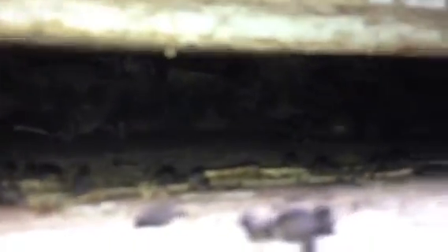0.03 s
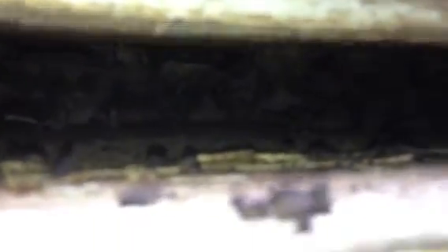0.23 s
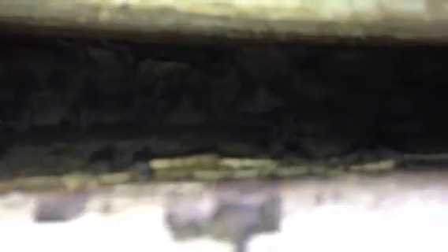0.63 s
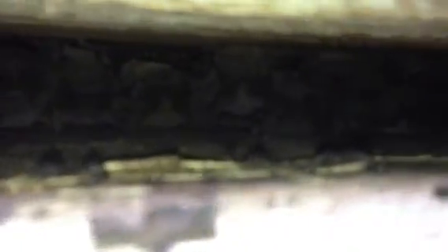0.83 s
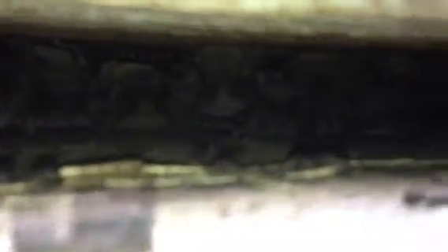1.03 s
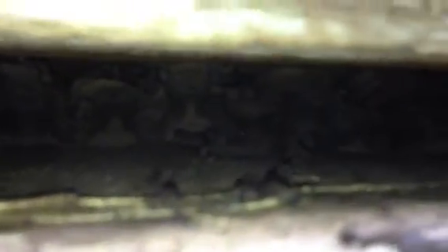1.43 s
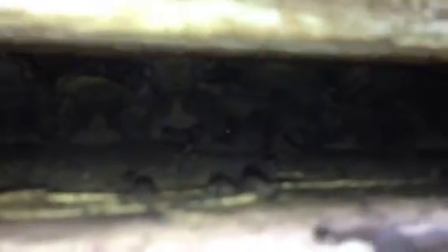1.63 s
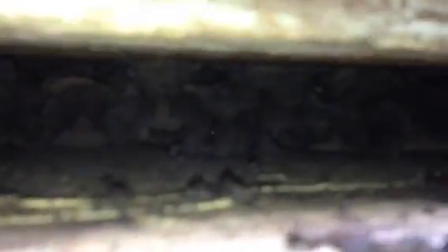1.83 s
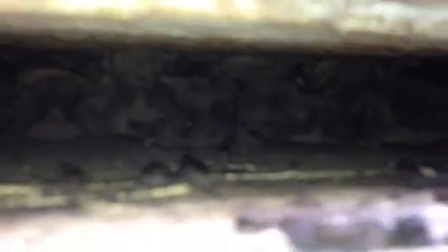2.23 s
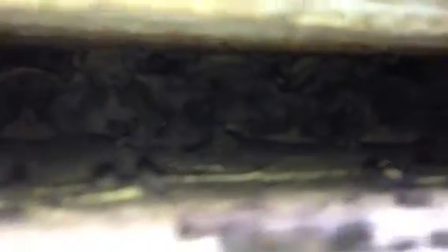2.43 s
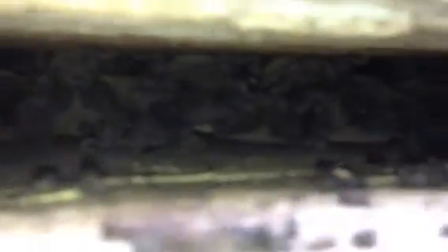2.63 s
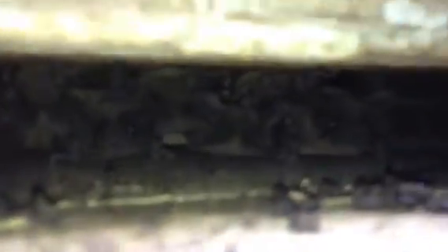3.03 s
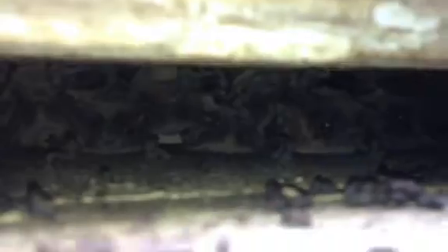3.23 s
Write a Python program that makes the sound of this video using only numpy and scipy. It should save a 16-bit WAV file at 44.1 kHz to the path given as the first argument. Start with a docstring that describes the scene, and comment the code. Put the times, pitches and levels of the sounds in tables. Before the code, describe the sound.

A bat colony chitters inside a vent, with piercing chirps, thin squeaks and scratchy clicks.

```python
"""Bats in a roof vent

A colony chitters close by: piercing chirps, mostly downward, thin squeaks and squeals, and rasping
click trains. Soft low mews, a second oscillator in the throat, flutter the squeaks and roughen them.
More bats twitter deeper in the cavity, with one shrill trill. The vent rings and the roof echoes;
a steady hiss, faint ticks and whistles and one soft bump lie underneath."""
import sys
import numpy as np
from scipy import signal
from scipy.fft import rfft, irfft, next_fast_len
from scipy.io import wavfile
from scipy.ndimage import uniform_filter1d, map_coordinates

SR = 44100
rng = np.random.default_rng(int(sys.argv[2]) if len(sys.argv) > 2 else 0)


def digitize_waveform(pressure):
    """Quantize a signal to 16-bit integers and store it at the path in sys.argv[1].

    Rows of a 2-D input are taken as channels; values are limited to [-1, 1].
    """
    field = np.atleast_2d(pressure).T
    bounded = np.clip(field, -1, 1)
    quanta = np.round(bounded * 32767).astype(np.int16)
    wavfile.write(sys.argv[1], SR, quanta)


N = 145530

# hiss spectrum (frequency [Hz], level [dB])
HISS_SPECTRUM = [(25, 2), (70, -14), (148, -1.5), (190, 2), (300, -5.5), (542, -9.5), (749, -5.5),
                 (1060, -10), (1510, -14.5), (1730, -10), (2390, -17.5), (2970, -16.5), (3680, -19),
                 (4690, -13.5), (5520, -17), (6400, -10.5), (7100, -1.5), (8000, -12), (9720, -17.5),
                 (11100, -12.5), (13100, -9), (14600, -7.5), (15800, -7)]
# click trains (time [s], length [s], first rate [1/s], last rate [1/s], body [dB], ring [dB], treble [dB])
RASPS = [(.003, 0.047, 233, 110, -55.5, -55, -50.5), (0.234, 0.0061, 1500, 1070, -54, -45.5, -51),
         (0.638, 0.046, 730, 434, -44, -56, -70), (0.725, 0.0074, 1340, 510, -36, -32.5, -34.5),
         (0.819, 0.0033, 2130, 1040, -39, -34.5, -30.5), (1.079, 0.0058, 1500, 830, -48.5, -45, -35),
         (2.194, 0.0072, 1750, 940, -43, -39, -39), (1.133, 0.052, 230, 310, -75, -75, -43.5),
         (1.343, .009, 900, 600, -40, -41.5, -37), (1.441, .0075, 1720, 1500, -41.5, -33.5, -25.5),
         (1.527, 0.021, 1630, 1970, -54, -42, -34.5), (1.681, 0.028, 2400, 1800, -62, -46, -32.5),
         (1.709, 0.025, 960, 600, -71, -51, -33), (1.825, 0.013, 2150, 650, -42.5, -32, -31),
         (1.92, 0.02, 2100, 650, -40, -36.5, -36.5), (1.967, 0.0063, 446, 374, -36.5, -36.5, -43),
         (2.2237, 0.015, 700, 680, -35.5, -36, -46), (2.305, .02, 2060, 750, -38, -43.5, -50),
         (2.323, 0.018, 650, 750, -35, -43, -39.5), (2.406, 0.026, 1800, 460, -37.5, -43.5, -46),
         (2.432, 0.022, 390, 560, -40, -52, -23), (2.4518, 0.0064, 1730, 1650, -44, -55, -24.5),
         (2.472, 0.01, 145, 170, -48, -49, -41), (2.5639, 0.043, 240, 240, -40, -39, -39.5),
         (2.692, 0.0068, 1900, 1600, -48.5, -42, -33), (2.709, 0.035, 310, 470, -38.5, -35, -42),
         (2.84, .0065, 2150, 2300, -41, -40, -29), (2.851, 0.037, 267, 390, -39, -35, -37)]
# three rasp resonances, each (frequency [Hz], level [dB])
BODY_SPECTRUM = [(180, -54), (300, -16), (432, -13), (703, 1.5), (989, 0.5), (1250, 5.5), (1460, 0),
                 (1730, 5), (2180, -3), (2490, -6), (2890, -6), (3860, -18), (4700, -14), (5500, -29),
                 (7150, -24), (12100, -120)]
RING_SPECTRUM = [(3000, -39), (5000, -12), (6300, -6), (7200, 2), (8300, -0.5), (9500, -8), (12000, -67)]
TREBLE_SPECTRUM = [(6000, -28.5), (9000, -25), (10800, 4), (12500, 0), (14000, -3.5), (15500, -15.5)]
# calls, each (time [s], length [s], first pitch [Hz], middle pitch [Hz], last pitch [Hz], level [dB])
SQUEAKS = [(0.039, 0.023, 7800, 7480, 7540, -43.5), (0.247, 0.0071, 9700, 9450, 9000, -40),
           (0.454, 0.059, 11400, 9900, 9100, -50.5), (0.577, 0.036, 10000, 8850, 9000, -44.5),
           (0.615, 0.011, 10250, 7320, 5860, -44), (.8165, .005, 7350, 7780, 8380, -26.5),
           (0.876, 0.032, 8600, 9100, 8200, -46), (0.93, 0.016, 12300, 12700, 13000, -44.5),
           (0.962, 0.017, 8800, 8110, 8800, -33), (1.077, 0.0048, 8400, 8730, 7700, -30.5),
           (1.087, 0.014, 12600, 11400, 11500, -40), (1.176, 0.028, 9800, 10100, 10800, -53),
           (1.352, .016, 10900, 14000, 11200, -38.5), (1.44, 0.012, 9000, 8180, 7430, -33.5),
           (1.603, 0.0073, 8900, 8440, 8100, -35), (1.77, 0.052, 8750, 8900, 7850, -47.5),
           (1.869, 0.02, 8300, 8100, 8000, -49.5), (1.915, 0.0052, 7530, 7600, 7400, -27),
           (1.937, .024, 15200, 15000, 14300, -43), (2.006, 0.017, 8700, 7980, 7550, -41.5),
           (2.161, 0.014, 7800, 7500, 6350, -39.5), (2.189, 0.0048, 7200, 7460, 7450, -28.5),
           (2.249, 0.014, 10300, 11360, 9850, -31), (2.305, 0.0095, 8020, 7980, 7700, -42.5),
           (2.401, .008, 8300, 7850, 7760, -41), (2.449, 0.01, 12130, 11670, 10200, -24.5),
           (2.507, 0.062, 13000, 10900, 10150, -43), (2.532, 0.0056, 7700, 8000, 8400, -30.5),
           (2.667, 0.013, 12800, 10500, 8750, -43), (3.012, 0.035, 13100, 12600, 11800, -44),
           (3.126, 0.018, 8250, 7800, 7040, -47), (3.276, 0.013, 8700, 7740, 7000, -39)]
MEWS = [(.055, 0.009, 1800, 1720, 1640, -41.5), (0.073, 0.012, 2240, 2010, 1860, -48),
        (.133, 0.019, 1820, 2030, 1930, -48), (0.233, 0.019, 1680, 2064, 2020, -46.5),
        (0.298, 0.033, 1820, 2140, 2210, -50.5), (0.49, 0.026, 2200, 2030, 2040, -54),
        (0.619, 0.0076, 1750, 1745, 1640, -36), (0.771, 0.02, 1780, 2000, 2200, -49),
        (0.836, 0.0038, 1630, 1720, 1730, -35.5), (0.874, 0.018, 2250, 2140, 1950, -51),
        (0.971, 0.0057, 1810, 1780, 1680, -45.5), (1.078, 0.018, 1726, 1565, 1430, -46),
        (1.164, 0.032, 1453, 1705, 1580, -43.5), (1.272, 0.0074, 1430, 1406, 1360, -39.5),
        (1.441, .011, 1706, 1702, 1590, -35), (1.527, 0.03, 1664, 1820, 1580, -37.5),
        (1.678, 0.035, 1990, 1977, 1730, -41), (1.826, 0.018, 1590, 1556, 1570, -41),
        (1.926, .018, 1720, 1300, 1110, -42.5), (2.007, 0.013, 1550, 1640, 1700, -46),
        (2.069, 0.0098, 1910, 1796, 1730, -38), (2.194, 0.0089, 1710, 1670, 1570, -38.5),
        (2.306, 0.0093, 1850, 1680, 1310, -48), (2.401, 0.0093, 1830, 1740, 1390, -44),
        (2.535, 0.018, 1790, 1920, 1850, -42.5), (2.689, 0.013, 1800, 2020, 2140, -45),
        (2.836, 0.0096, 2200, 2100, 2120, -43.5), (2.989, .02, 1790, 1914, 2220, -45.5),
        (3.124, 0.011, 1700, 1606, 1540, -50), (3.179, 0.0031, 1800, 1830, 1700, -41),
        (3.285, 0.003, 1730, 1600, 1570, -42)]
CHIRPS = [(.139, .008, 14500, 12500, 10000, -33), (.278, .0062, 15600, 13500, 13400, -9),
          (.4005, .005, 15600, 14000, 15200, -12), (.5148, .005, 15200, 13800, 14900, -12),
          (.555, .006, 8000, 10000, 12500, -31), (.6163, .005, 15100, 14200, 14300, -13),
          (.629, .006, 6800, 8400, 11000, -24), (.7345, .007, 11500, 13800, 15800, -19),
          (.8356, .0057, 13700, 12500, 14800, -8), (.865, .003, 15000, 13000, 11500, -27),
          (.8797, .003, 15000, 12800, 11000, -22), (1.025, .006, 13500, 11500, 10000, -30),
          (1.1183, .004, 15400, 13600, 11600, -20), (1.144, .003, 15500, 14300, 13500, -23),
          (1.1498, .0045, 15500, 13200, 10500, -17), (1.286, .006, 14000, 11800, 10000, -35),
          (1.482, .007, 14800, 12500, 10500, -35), (1.526, .0075, 15700, 13600, 10800, -15),
          (1.582, .005, 10000, 12500, 14500, -29), (1.595, .007, 13000, 10800, 9500, -31),
          (1.622, .008, 15700, 13200, 10800, -14), (1.719, .006, 15300, 12900, 10800, -16),
          (1.8155, .0085, 15700, 12900, 10300, -12.5), (1.9128, .0072, 15600, 13400, 10500, -14),
          (1.9628, .006, 15000, 13500, 14200, -16.5), (2.108, .0065, 15500, 13600, 14700, -17),
          (2.3412, .0035, 12000, 11400, 11200, -19), (2.3525, .006, 15300, 13900, 15200, -18.5),
          (2.4795, .004, 10000, 12000, 14500, -29), (2.495, .0055, 15300, 14300, 15300, -20),
          (2.549, .004, 12000, 13500, 15000, -29), (2.7275, .006, 15500, 14200, 15200, -19),
          (2.750, .004, 9000, 8300, 7500, -19), (2.794, .006, 8000, 10500, 13500, -36),
          (2.8925, .0028, 9000, 8400, 7700, -21), (2.954, .003, 10000, 12500, 15500, -27),
          (2.9595, .004, 11500, 9500, 8300, -29), (3.113, .005, 9000, 11500, 14000, -33),
          (3.179, .004, 9500, 12500, 15000, -22), (3.283, .006, 9500, 12300, 15000, -27),
          (.264, .006, 13500, 11800, 10500, -38), (.852, .004, 8000, 10500, 14000, -33),
          (1.272, .008, 10000, 12200, 13500, -39), (1.327, .007, 7500, 9200, 12000, -41),
          (2.624, .005, 8500, 11500, 15000, -38), (2.927, .009, 10500, 13000, 14500, -39),
          (3.089, .005, 11000, 13000, 15500, -36)]
# mew overtones (harmonic number, level [dB])
MEW_OVERTONES = [(2, -22), (3, -21), (4, -21)]
# bending squeals, one list of points each (time [s], pitch [Hz], level [dB])
SQUEALS = [
    [(.209, 14900, -37), (.217, 14200, -30), (.224, 10800, -27.5), (.231, 10330, -39)],
    [(.374, 13800, -33), (.39, 10800, -35.5), (.405, 10200, -39), (.416, 9500, -43), (.423, 7650, -50)],
    [(1.524, 7500, -33), (1.533, 7960, -43), (1.557, 8400, -32), (1.564, 7500, -39)],
    [(1.674, 8180, -22), (1.679, 8560, -34), (1.682, 8050, -25), (1.686, 8080, -30), (1.692, 8190, -29),
     (1.705, 8400, -26.5), (1.712, 8800, -30.5), (1.717, 8430, -29), (1.72, 7300, -33)],
    [(2.058, 7540, -30), (2.063, 7250, -29.5), (2.069, 8400, -28), (2.078, 8140, -29.5)],
    [(2.68, 7550, -24), (2.685, 6270, -34.5), (2.69, 7650, -27), (2.695, 8360, -30)],
    [(2.8215, 7200, -35), (2.824, 6300, -38), (2.834, 6660, -28), (2.837, 7590, -22), (2.84, 7600, -28.5),
     (2.846, 8540, -28)],
    [(2.966, 7070, -32), (2.976, 7120, -29), (2.981, 8070, -25.5), (2.986, 7970, -21.5), (2.99, 9330, -32),
     (3.008, 8950, -25.5), (3.012, 9500, -37), (3.018, 9000, -25), (3.027, 8980, -29), (3.031, 9400, -39),
     (3.039, 9200, -40)],
]
# bump modes (frequency [Hz], level [dB], T60 [s])
BUMP_MODES = [(171, -32, 0.022), (250, 0, 0.034), (366, -0.5, 0.018), (444, 7.5, 0.023), (784, -2.5, 0.035)]
# sweep of one trill note (first pitch [Hz], middle pitch [Hz], last pitch [Hz])
TRILL_SWEEP = [16000, 14800, 13100]
# held whistles (time [s], length [s], pitch [Hz], level [dB])
WHISTLES = [(2.49, .17, 4650, -62), (2.8, .18, 4600, -65), (3.16, .14, 4550, -60.5)]
# bounces off the vent walls (delay [s], level [dB])
WALL_BOUNCES = [(.0007, -28), (.0013, -21.5), (.0022, -21.5)]

CHIRP_TAPER, SQUEAK_TAPER, MEW_TAPER = .95, .1, .38  # share of a call spent rising and falling
GRIT_PER_S = 2000


def amp(db):
    """Decibels to gain."""
    return 10 ** (np.asarray(db) / 20)


def unit(x):
    """Scale to rms 1."""
    return x / np.sqrt(np.mean(x ** 2) + 1e-20)


def add(track, time_s, x):
    """Mix x into the track at time_s."""
    i = min(N, max(0, round(time_s * SR)))
    track[i:i + len(x)] += x[:N - i]


def wobble(knots_per_s, n):
    """Smooth random curve, n samples."""
    return map_coordinates(rng.standard_normal(256), [np.arange(n) * knots_per_s / SR], mode="mirror")


def grit(depth, n):
    """Fast random flicker of level and phase: complex gain, rms 1."""
    level = unit(np.exp(depth * wobble(GRIT_PER_S, n)))
    return level * np.exp(1j * depth * wobble(GRIT_PER_S, n))


def coloured(x, spectrum):
    """Minimum-phase filter through points (frequency [Hz], level [dB])."""
    m = 2 * next_fast_len(len(x))
    hz, db = np.transpose(spectrum)
    bin_db = np.interp(np.log(np.fft.rfftfreq(m, 1 / SR) + 1), np.log(hz + 1), db)
    cepstrum = irfft(np.log(amp(bin_db)), m)
    cepstrum[1:m // 2] *= 2
    cepstrum[m // 2 + 1:] = 0
    return irfft(rfft(x, m) * np.exp(rfft(cepstrum)), m)[:len(x)]


def wavering_phase(hz, depth=.009, knots_per_s=500):
    """Phase of a slightly unsteady voice on this pitch curve."""
    return 2 * np.pi * np.cumsum(hz * (1 + depth * wobble(knots_per_s, len(hz)))) / SR


def call(length_s, pitches_hz, taper):
    """Envelope and phase of one call arching through three pitches."""
    n = max(16, round(length_s * SR))
    arch_hz = np.polyval(np.polyfit([0, .5, 1], pitches_hz, 2), np.linspace(0, 1, n))
    return np.sqrt(2) * signal.windows.tukey(n, taper), wavering_phase(arch_hz)


def puffed(clicks, share=1, puff_db=-26.5, t60_s=.028):
    """Clicks, each trailed by a short puff of noise."""
    decay = amp(-60 / (t60_s * SR))
    envelope = signal.lfilter([1], [1, -decay], clicks)
    return clicks + share * amp(puff_db) * envelope * rng.standard_normal(len(clicks))


def scattered(x, wet_db, t60_s=.009, delay_s=.0006):
    """Short call blurred by the nearest surfaces, energy unchanged."""
    t = np.arange(SR // 50) / SR
    tail = rng.standard_normal(len(t)) * amp(-60 * t / t60_s) * (t > delay_s)
    echo = signal.fftconvolve(x, tail)
    echo *= amp(wet_db) * np.linalg.norm(x) / np.linalg.norm(echo)
    both = np.pad(x, (0, len(t) - 1)) + echo
    return both * np.linalg.norm(x) / np.linalg.norm(both)


def hiss(level_db=-47.5, patch_db=2):
    """Steady noise, slightly patchy in time and frequency."""
    noise = signal.stft(rng.standard_normal(N), nperseg=512)[2]
    patches = uniform_filter1d(rng.standard_normal(noise.shape), size=8, axis=0)
    patches = unit(uniform_filter1d(patches, size=12, axis=1))
    patchy = signal.istft(noise * amp(patch_db * patches), nperseg=512)[1][:N]
    return amp(level_db) * unit(coloured(patchy, HISS_SPECTRUM))


def rasp_spectrum(levels_db):
    """Power sum of the three resonances, each at its own level."""
    hz = np.geomspace(100, SR / 2, 200)
    power = 0
    for db, resonance in zip(levels_db, (BODY_SPECTRUM, RING_SPECTRUM, TREBLE_SPECTRUM)):
        shape_hz, shape_db = np.transpose(resonance)
        part = amp(np.interp(np.log(hz), np.log(shape_hz), shape_db)) ** 2
        power += amp(db) ** 2 * part / np.sum(part * np.gradient(hz))
    return np.column_stack([hz, 10 * np.log10(power)])


def rasps(ragged_below_per_s=700, jitter_cycles=.1, scatter_db=1.8, swell_db=2.5):
    """Swelling click trains at a gliding rate: ragged when slow, a tone when fast."""
    out = np.zeros(N)
    for time_s, length_s, first_per_s, last_per_s, *levels_db in RASPS:
        n = round(length_s * SR)
        slip, size = rng.standard_normal((2, 128))
        rate_per_s = np.geomspace(first_per_s, last_per_s, n)
        cycles = np.cumsum(rate_per_s) / SR
        k = np.arange(min(len(slip), int(cycles[-1]) + 1))
        ragged = np.minimum(1, ragged_below_per_s / np.interp(k, cycles, rate_per_s)) ** 2
        at = np.interp(k + jitter_cycles * ragged * slip[k], cycles, np.arange(n)).astype(int)
        click_db = scatter_db * ragged * size[k] + swell_db * np.sin(np.pi * at / n)
        clicks = np.bincount(at, amp(click_db), n + SR // 20)
        rasp = coloured(puffed(clicks, ragged.mean()), rasp_spectrum(levels_db))
        add(out, time_s, np.linalg.norm(amp(levels_db)) * np.sqrt(n) * rasp / np.linalg.norm(rasp))
    return out


def ticks(rate_per_s=36, body_db=-62, treble_boost_db=5, scatter_db=3):
    """Faint stray clicks through the body and treble resonances."""
    slip, low, high = rng.standard_normal((int(rate_per_s * N / SR), 3)).T
    at = ((np.arange(len(slip)) + slip) * SR / rate_per_s).astype(int) % N
    body = unit(coloured(puffed(np.bincount(at, amp(scatter_db * low), N)), BODY_SPECTRUM))
    treble = unit(coloured(puffed(np.bincount(at, amp(scatter_db * high), N)), TREBLE_SPECTRUM))
    return amp(body_db) * (body + amp(treble_boost_db) * treble)


def far_bats(rate_per_s=32, centre_hz=11400, length_s=.005, level_db=-46.5, scatter_db=4.5):
    """Scratchy up or down twitters deeper in the roost, loosely spaced."""
    out = np.zeros(N)
    for k in range(int(rate_per_s * N / SR)):
        slip, pitch, size, stretch, slope = rng.standard_normal(5)
        glide = np.sign(slope) * np.array([-.3, 0, .3])
        pitches_hz = centre_hz * np.exp(.12 * pitch + glide)
        swell, phase = call(length_s * np.exp(.5 * stretch), pitches_hz, CHIRP_TAPER)
        twitter = scattered(swell * np.imag(grit(.28, len(swell)) * np.exp(1j * phase)), wet_db=6)
        add(out, abs(k + slip) / rate_per_s, amp(level_db + scatter_db * size) * twitter)
    return out


def high_voice(swell, phase, octave_db=-7.5):
    """The throat's hoarse high oscillator, complex; its octave sounds only below Nyquist."""
    octave = amp(octave_db) * (np.gradient(phase) < np.pi / 2)
    return swell * grit(.12, len(swell)) * (np.exp(1j * phase) + octave * np.exp(2j * phase))


def squeaks():
    """Thin, drawn-out arches of the high oscillator."""
    out = np.zeros(N, complex)
    for time_s, length_s, *pitches_hz, db in SQUEAKS:
        add(out, time_s, amp(db) * high_voice(*call(length_s, pitches_hz, SQUEAK_TAPER)))
    return out


def mews(flicker_per_s=800, grit_depth=.28, saturation_db=-34):
    """The throat's low oscillator: its sound and the flutter it puts on the high one."""
    sound, flutter = np.zeros(N), np.zeros(N, complex)
    for time_s, length_s, *pitches_hz, db in MEWS:
        swell, phase = call(length_s, pitches_hz, MEW_TAPER)
        n = len(swell)
        flicker = np.exp(.25 * wobble(flicker_per_s, n))
        overtones = sum(amp(overtone_db) * np.exp(1j * k * phase) * grit(grit_depth, n)
                        for k, overtone_db in MEW_OVERTONES)
        add(sound, time_s, amp(db) * swell * flicker * (np.sin(phase) + overtones.imag))
        depth = np.tanh(amp(db - saturation_db) * swell)
        rough_phase = phase + grit_depth * wobble(GRIT_PER_S, n)
        add(flutter, time_s, depth * np.exp(1j * rough_phase))
    return sound, flutter


def throat(lower_sideband=.11, upper_sideband=.68):
    """Two coupled oscillators: mews give squeaks and squeals rough sidebands."""
    low, flutter = mews()
    high = squeaks() + squeals()
    modulation = (1 + lower_sideband * flutter.conj()) / (1 - upper_sideband * flutter)
    return low + np.imag(high * modulation)


def chirps(half_wet_db=-29, lead_s=.0029, lead_db=-17):
    """Steep sweeps out of a soft lead-in; the fainter, the farther and more blurred."""
    out = np.zeros(N)
    for time_s, length_s, *pitches_hz, db in CHIRPS:
        swell, phase = call(length_s, pitches_hz, CHIRP_TAPER)
        sweep = swell * np.imag(grit(.16, len(swell)) * np.exp(1j * phase))
        add(out, time_s, amp(db) * scattered(sweep, wet_db=.5 * (half_wet_db - db)))
        swell, phase = call(2 * lead_s, [pitches_hz[0]] * 3, taper=.83)
        add(out, time_s - lead_s, amp(db + lead_db) * swell * np.sin(phase))
    return out


def squeals(fade_s=.0013):
    """Long calls of the high oscillator that bend and break."""
    out = np.zeros(N, complex)
    for points in SQUEALS:
        times_s, hz, db = np.transpose(points)
        t = np.arange(times_s[0], times_s[-1], 1 / SR)
        fades = signal.windows.tukey(len(t), 2 * fade_s * SR / len(t))
        swell = np.sqrt(2) * amp(np.interp(t, times_s, db)) * fades
        add(out, times_s[0], high_voice(swell, wavering_phase(np.interp(t, times_s, hz))))
    return out


def bump(time_s=.458, gain_db=-39):
    """One soft, dull knock: damped low modes."""
    out, t = np.zeros(N), np.arange(SR // 10) / SR
    for hz, db, t60_s in BUMP_MODES:
        add(out, time_s, amp(gain_db + db - 60 * t / t60_s) * np.sin(2 * np.pi * hz * t))
    return out


def trill(time_s=.858, length_s=.18, rate_per_s=155, note_s=.006, level_db=-40):
    """Shrill run of tiny downward sweeps, blurred by distance."""
    out = np.zeros(N)
    for k in range(int(length_s * rate_per_s)):
        swell, phase = call(note_s, TRILL_SWEEP, CHIRP_TAPER)
        add(out, time_s + k / rate_per_s, amp(level_db) * scattered(swell * np.sin(phase), wet_db=0))
    return out


def whistles(width_hz=150):
    """Faint, airy held tones: narrow noise bands."""
    out = np.zeros(N)
    for time_s, length_s, hz, db in WHISTLES:
        swell, phase = call(length_s, [hz] * 3, SQUEAK_TAPER)
        n = len(swell)
        air = wobble(width_hz, n) * np.sin(phase) + wobble(width_hz, n) * np.cos(phase)
        add(out, time_s, amp(db) * swell * air / np.sqrt(2))
    return out


def walls(x):
    """Direct sound plus first bounces, which ripple every sweep."""
    out = x.copy()
    for delay_s, db in WALL_BOUNCES:
        add(out, delay_s, amp(db) * x)
    return out


def cavity(x, t60_s):
    """Dense, decaying reflections."""
    t = np.arange(SR // 4) / SR
    tail = rng.standard_normal(len(t)) * amp(-60 * t / t60_s) * (t > .001)
    return signal.fftconvolve(x, tail / np.linalg.norm(tail))[:N]


def scene():
    """Bats with the vent's short ring and the roof's longer echo, over bump and hiss; mono."""
    bats = walls(chirps() + throat() + trill() + far_bats()) + rasps() + ticks() + whistles()
    vent_ring = amp(-17) * cavity(bats, t60_s=.03)
    roof_echo = amp(-27) * cavity(bats, t60_s=.15)
    return (bats + vent_ring + roof_echo + bump() + hiss())[None]


def record(dry, low_cut_hz=110, top_hz=15750):
    """Recorder: bass roll-off and a hard band limit."""
    m = next_fast_len(N + SR // 2)
    thin = signal.sosfilt(signal.butter(2, low_cut_hz, "highpass", fs=SR, output="sos"), dry)
    passband = np.fft.rfftfreq(m, 1 / SR) < top_hz
    return irfft(rfft(thin, m) * passband, m)[:, :N]


dry = scene()
out = record(dry)
digitize_waveform(out)
```